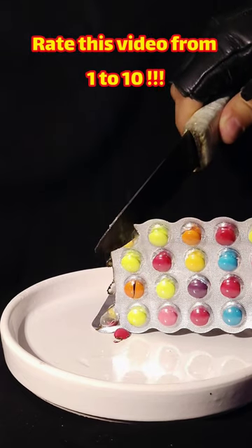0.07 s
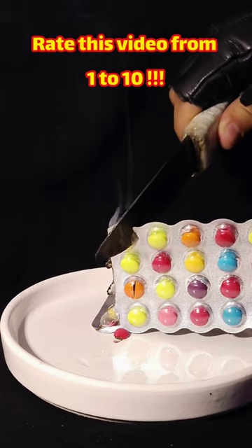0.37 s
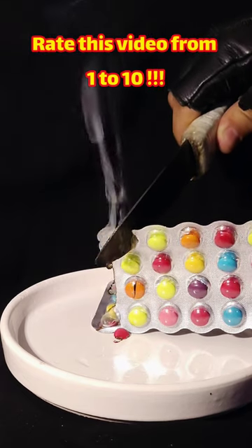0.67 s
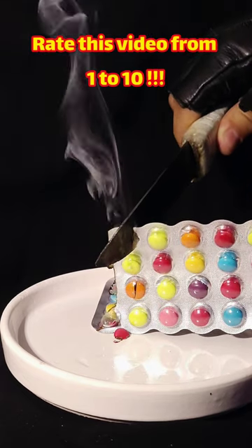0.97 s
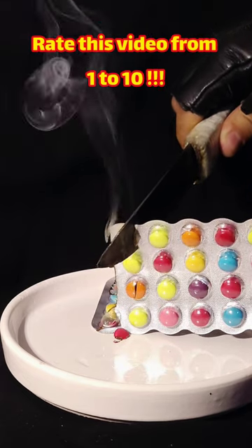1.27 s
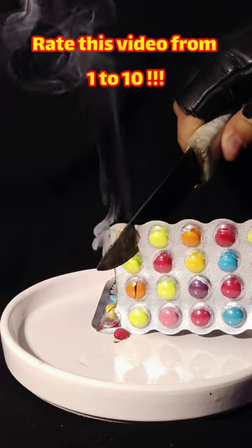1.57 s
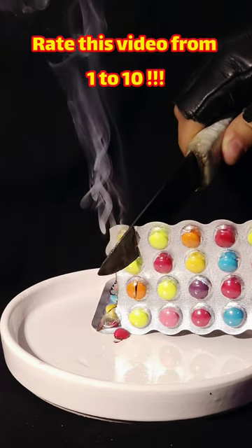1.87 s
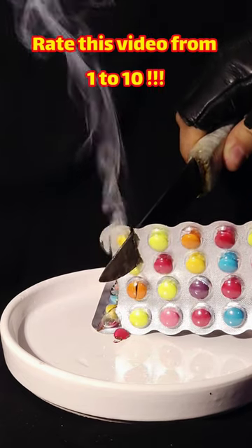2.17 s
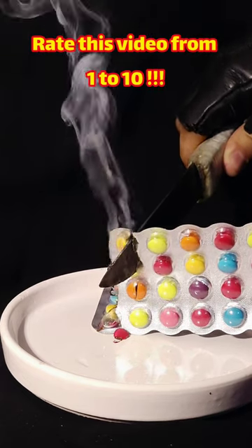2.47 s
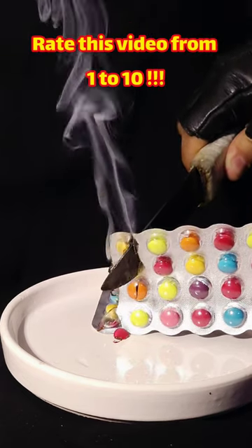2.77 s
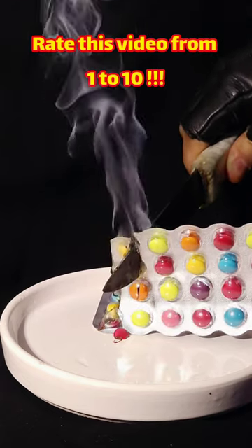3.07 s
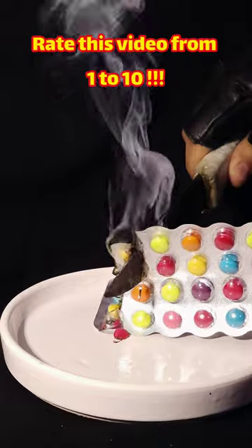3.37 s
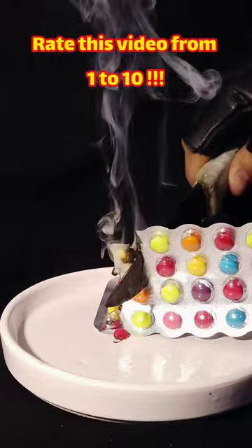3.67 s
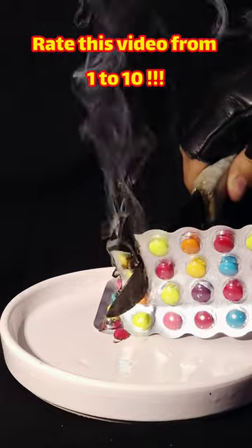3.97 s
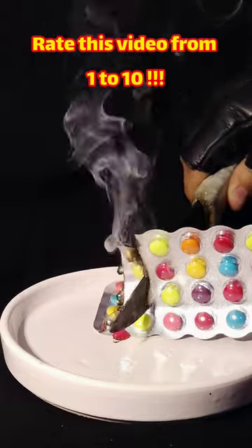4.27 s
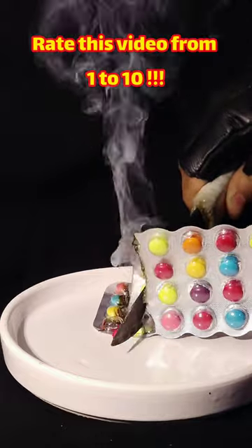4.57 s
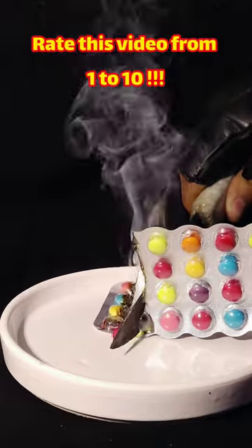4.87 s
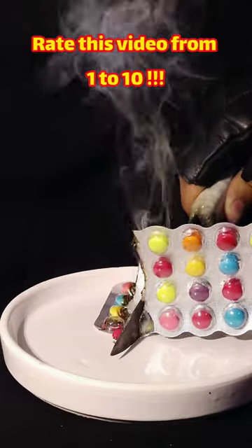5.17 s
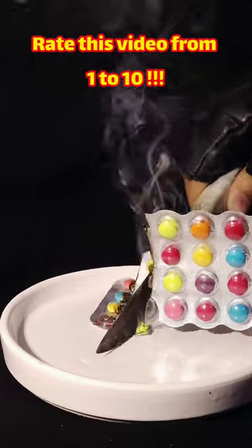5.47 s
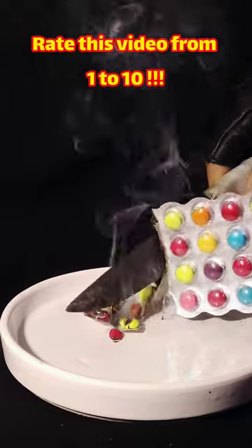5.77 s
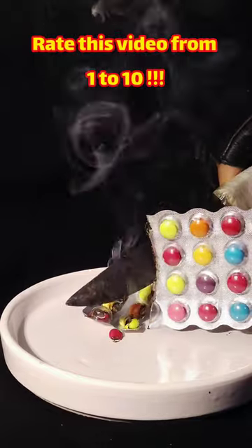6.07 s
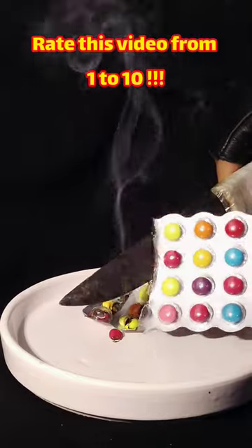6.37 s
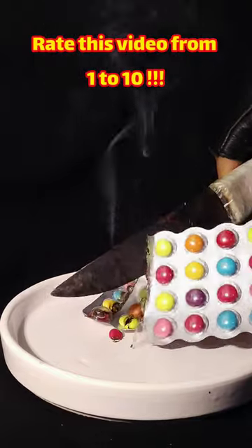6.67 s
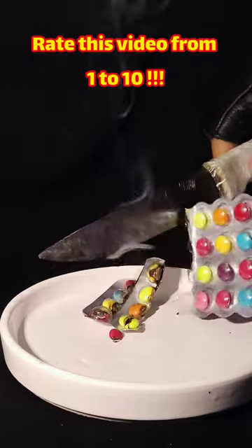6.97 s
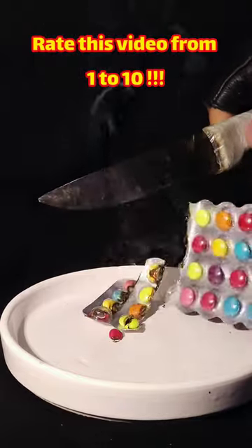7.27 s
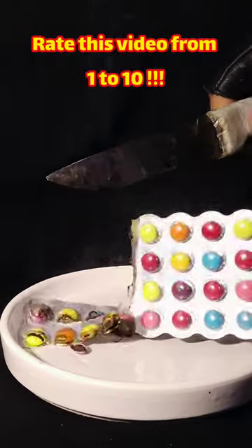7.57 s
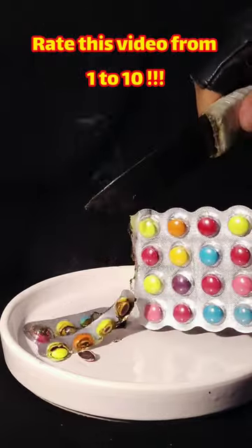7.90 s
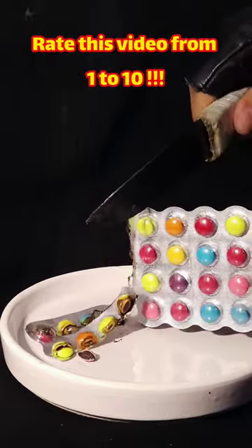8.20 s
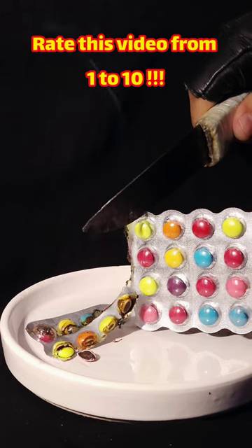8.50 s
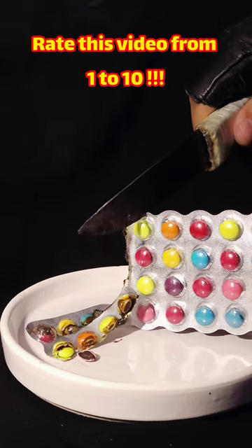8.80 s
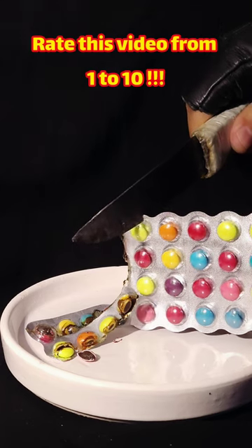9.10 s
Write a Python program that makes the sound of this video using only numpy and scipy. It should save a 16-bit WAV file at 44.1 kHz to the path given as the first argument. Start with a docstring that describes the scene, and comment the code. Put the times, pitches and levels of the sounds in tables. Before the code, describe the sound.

Close, soft fizzing and crackles of melting plastic packaging, with two sharp clacks of a blade on a plate, then crinkly scraping.

```python
"""A small, quiet room, a stereo microphone close to a ceramic plate, a fan far off.
On the plate a hot knife melts down through a plastic and foil blister pack. The melt fizzes; the pack
crackles, and creaks and groans as the blade sticks and slips. The blade breaks through and knocks on
the plate twice. Then the pack is dragged free and its cut strip scrapes over the glaze."""
import sys
import numpy as np
from scipy import signal
from scipy.fft import rfft, irfft, next_fast_len
from scipy.io import wavfile
from scipy.ndimage import uniform_filter1d, map_coordinates

SR = 44100
rng = np.random.default_rng(int(sys.argv[2]) if len(sys.argv) > 2 else 0)


def output_pcm(signal):
    """Save a mono or channel-first signal as 16-bit PCM at the path in sys.argv[1].

    Samples are clipped to [-1, 1] before scaling.
    """
    pcm = np.clip(np.atleast_2d(signal).T, -1, 1) * 32767
    wavfile.write(sys.argv[1], SR, np.round(pcm).astype(np.int16))


N = 411894
TIME = np.arange(N) / SR
AGE = np.arange(SR // 2) / SR  # seconds into one short event


def amp(db):
    """Decibels to gain."""
    return 10 ** (np.asarray(db) / 20)


def unit(x):
    """Scale to rms 1."""
    return x / np.sqrt(np.mean(x ** 2) + 1e-20)


def struck(x):
    """Scale so that the first 8 ms have rms 1."""
    return x / np.sqrt(np.mean(x[:350] ** 2) + 1e-20)


def along(points, hz):
    """Read (frequency, value) points on a log axis."""
    f, values = np.transpose(points)
    return np.interp(np.log(hz + 1), np.log(f + 1), values)


def curve(rows, column=1):
    """One column of a timed table, per sample."""
    rows = np.asarray(rows)
    return np.interp(TIME, rows[:, 0], rows[:, column])


def fade(t60):
    """Exponential decay, 60 dB down after t60 seconds."""
    return np.exp(-np.log(1000) * AGE / max(t60, 1e-3))


def swell(middle_s, half_s):
    """A bell-shaped rise and fall."""
    return np.exp(-.5 * ((TIME - middle_s) / half_s) ** 2)


def envelope(start, end, attack_s, release_s, sag_db_per_s=0):
    """Attack, a hold that may sag, release."""
    held = np.clip(TIME - start, 0, end - start)
    rise = np.clip((TIME - start) / attack_s, 0, 1)
    release = np.exp(-np.clip((TIME - end) / release_s, 0, 20))
    return rise * amp(-sag_db_per_s * held) * release


def wobble(rate, size=N):
    """A smooth random curve, rate knots a second."""
    knots = rng.standard_normal(int(size * rate / SR) + 4)
    return map_coordinates(knots, [TIME[:size] * rate], order=2)


def filtered(x, response):
    """Filter by a complex response of frequency."""
    n = x.shape[-1]
    padded = 2 * next_fast_len(n // 2 + 4096)
    hz = np.fft.rfftfreq(padded, 1 / SR)
    return irfft(rfft(x, padded) * response(hz), padded)[..., :n]


def coloured(x, spectrum, size=2048):
    """Minimum-phase filter with the given spectrum."""
    gain = amp(along(spectrum, np.fft.rfftfreq(size, 1 / SR)))
    cepstrum = irfft(np.log(gain))
    cepstrum[1:size // 2] *= 2
    cepstrum[size // 2 + 1:] = 0
    impulse = irfft(np.exp(rfft(cepstrum)))
    return signal.oaconvolve(x, impulse)[:len(x)]


def band(x, low_hz, high_hz):
    """Causal band-pass."""
    sos = signal.butter(3, [low_hz, min(high_hz, .49 * SR)], "band", fs=SR, output="sos")
    return signal.sosfilt(sos, x)


def patches(x, depth_db):
    """Bands swell and fade, each at its own moments."""
    bands = signal.stft(x, nperseg=512)[2]
    drift = uniform_filter1d(rng.standard_normal(bands.shape), size=5, axis=0)
    drift = unit(uniform_filter1d(drift, size=40, axis=1))
    return unit(signal.istft(bands * amp(depth_db * drift), nperseg=512)[1][:N])


def leaning(pair, balance):
    """Tilt a stereo pair left or right by frequency, keeping its power."""
    def response(hz):
        sides = np.array([amp(along(balance, hz)), np.ones_like(hz)])
        return sides / np.sqrt(np.mean(sides ** 2, axis=0))
    return filtered(pair, response)


def add(track, t, sound):
    """Mix a sound in at t seconds."""
    part = track[round(t * SR):][:len(sound)]
    part += sound[:len(part)]


def grains(size, rate, spread_db):
    """Tiny random clicks of uneven strength, rate a second, rms 1."""
    hits = rng.random(size) < rate / SR
    sign = rng.choice([-1, 1], size)
    strength = amp(spread_db * np.clip(rng.standard_normal(size), -2, 2))
    return unit(hits * sign * strength)


def burst(t60, crack_db, crack_t60):
    """A sharp crack followed by a short crumple."""
    return grains(len(AGE), rate=6800, spread_db=4.5) * (fade(t60) + amp(crack_db) * fade(crack_t60))


def ring(modes, scatter_db):
    """Damped modes with random phases and strengths scattered by scatter_db."""
    draws = rng.standard_normal((len(modes), 2))
    return sum(amp(db + scatter_db * strength) * fade(t60) * np.sin(2 * np.pi * hz * AGE + np.pi * phase)
               for (hz, db, t60), (strength, phase) in zip(modes, draws))


def stick_slip(speed, jitter, scatter_db):
    """One pulse per slip, unevenly spaced; faster slips are weaker, so the power holds."""
    rate = curve(speed) * np.exp(jitter * wobble(150))
    slips = np.diff(np.floor(np.cumsum(rate) / SR), prepend=0)
    return slips / np.sqrt(rate) * amp(scatter_db * wobble(200))


# Spectrum of the room's air: f/Hz, level/dB (levels in all tables are relative)
AIR_SPECTRUM = [(20, -18.5), (50, -11.5), (90, -5.5), (200, -7), (290, -8), (350, -5.5), (420, -6.5),
                (530, -4), (800, -21.5), (1500, -28.5), (2500, -33), (5000, -44.5), (9000, -41.5),
                (16000, -47)]
# Tones of the far fan: f/Hz, level/dB
FAN_TONES = [(50, -81), (120, -81), (355, -77.5), (1135, -90.5)]
# The background sits to the right: f/Hz, left minus right/dB
ROOM_BALANCE = [(150, -1), (500, -4), (1100, -12.5), (2200, -1.5)]
def room_tone():
    """Low air noise all round the microphone and the faint, unsteady hum of a far fan."""
    shared, left, right = (unit(coloured(rng.standard_normal(N), AIR_SPECTRUM)) for _ in range(3))
    hum = sum(amp(db) * np.sqrt(2) * np.sin(2 * np.pi * hz * TIME + 1.4 * wobble(19))
              for hz, db in FAN_TONES)
    air = amp(-73.5 + .57 * wobble(9)) * (shared + amp(-3.5) * np.array([left, right]))
    return leaning(air + hum, ROOM_BALANCE)


# Decay of the room: f/Hz, t60/s
ROOM_DECAY = [(100, 0.53), (1000, 0.32), (5000, 0.35), (15000, 0.14)]
def reverb(x):
    """The walls answer after 3 ms, differently on each side of the microphone."""
    hz, t, noise = signal.stft(rng.standard_normal((2, SR // 2)), SR, nperseg=256)
    decay = np.exp(-np.log(1000) * t / along(ROOM_DECAY, hz)[:, None])
    tail = signal.istft(noise * decay, SR)[1]
    tail = np.pad(tail / np.linalg.norm(tail[0]), ((0, 0), (SR // 300, 0)))
    return signal.oaconvolve(x[None], tail, axes=1)[:, :N]


def near_echoes(x, taps=500):
    """Plate and table echo the treble within milliseconds; the echoes shift as the pack moves."""
    treble = band(x, 1900, SR / 2)
    bands = signal.stft(treble, nperseg=128)[2]
    phases = np.exp(2j * np.pi * rng.random((2, *bands.shape)))
    scatter = signal.istft(bands * phases, nperseg=128)[1][:, :N]
    echoes = rng.standard_normal((2, 2, taps)) * np.linspace(1, 0, taps) ** 2
    echoes /= np.linalg.norm(echoes, axis=2, keepdims=True)
    here, there = signal.oaconvolve(treble[None, None], echoes, axes=2)[..., :N]
    place = 2 * wobble(6)
    return amp(-4.5) * scatter + amp(-2.5) * (np.cos(place) * here + np.sin(place) * there)


# Pushes of the hand: middle t/s, half length/s, level/dB
HAND_PUSHES = [(3.15, 0.18, -76), (5.4, 0.22, -69), (6.25, .25, -71), (7.7, 0.58, -75), (8.77, 0.12, -64.5)]
# Dull bumps through the table: t/s, level/dB, t60/s, lower f/Hz, upper f/Hz
TABLE_BUMPS = [(1.19, -52, 0.3, 50, 318), (1.244, -49.5, 0.56, 50, 320), (2.052, -40.5, 0.1, 70, 282),
               (2.089, -43, 0.17, 60, 285), (4.594, -34, 0.26, 40, 220), (5.056, -28, 0.27, 45, 378),
               (8.748, -49, 0.62, 200, 755)]
def table_bumps():
    """The hand on the plate shakes the table: a steady rumble, swells and thuds."""
    force = amp(-85) + sum(amp(db) * swell(t, half) for t, half, db in HAND_PUSHES)
    out = unit(band(rng.standard_normal(N), 64, 97)) * force * amp(-2)
    for t, db, t60, low_hz, high_hz in TABLE_BUMPS:
        thud = unit(band(rng.standard_normal(len(AGE)), low_hz, high_hz))
        add(out, t, amp(db - 8) * thud * fade(t60) * (1 - fade(.012)))
    return out


# Gentle drags of the blade: start t/s, end t/s, level/dB
GENTLE_DRAGS = [(1.69, 1.92, -62.5), (2.11, 2.304, -61.5)]
def sheet_drone(start_hz=126.5, sag_hz_per_s=52):
    """The whole sheet hums softly as the blade drags, ever lower."""
    pitch = start_hz - sag_hz_per_s * (TIME - GENTLE_DRAGS[0][0])
    phase = 2 * np.pi * np.cumsum(pitch) / SR
    tone = np.sin(phase) + amp(-12.5) * np.sin(2 * phase) + amp(-6.5) * np.sin(3 * phase)
    drag = sum(amp(db) * envelope(start, end, attack_s=.04, release_s=.053, sag_db_per_s=44)
               for start, end, db in GENTLE_DRAGS)
    return tone * drag * amp(1.2 * wobble(40))


# Melt on the hot blade: t/s, fizz level/dB, frying level/dB
MELT_LEVELS = [(0, -74, -71), (.55, -69, -74.5), (.85, -69.5, -81), (1.25, -66.5, -73), (1.9, -72.5, -81),
               (2.5, -74.5, -81), (3.2, -68.5, -66), (3.8, -69.5, -79), (4.3, -71, -73), (5.0, -72, -83.5),
               (5.5, -72.5, -84.5), (5.75, -75, -73), (6.72, -86, -83), (6.95, -68, -70), (7.9, -82.5, -82),
               (8.4, -93.5, -93), (8.85, -96, -91), (9.3, -80.5, -75)]
# Spectra of the fine fizz and the coarser frying: f/Hz, level/dB
FIZZ_SPECTRUM = [(4000, -34), (7600, -4), (8600, -5), (10400, 0), (11100, 1), (11800, 2), (12600, 1),
                 (13400, 0.5), (16000, -4)]
FRY_SPECTRUM = [(600, -8), (1050, -1), (1300, -9), (1600, -6.5), (2200, -14.5), (3700, -9), (4250, -1),
                (5100, -1), (5800, -8), (6600, -3), (7800, -12.5), (16000, -22)]
def sizzle():
    """Melt bubbles burst: a fine, spitting fizz, the same on both sides, over wide, coarser frying."""
    bubbles = grains(N, rate=7000, spread_db=5.5) * amp(.97 * wobble(45))
    spits = amp(-14.5) * grains(N, rate=60, spread_db=5)
    fizz = patches(coloured(bubbles + spits, FIZZ_SPECTRUM), depth_db=.9)
    fry = np.array([patches(coloured(grains(N, rate=5900, spread_db=6), FRY_SPECTRUM), depth_db=4.5)
                    for _ in range(2)])
    fizz_db = curve(MELT_LEVELS) + .8
    fry_db = curve(MELT_LEVELS, column=2) + .93 * wobble(12) + 4.5
    return fizz * amp(fizz_db) + fry * amp(fry_db)


# Modes of the ceramic plate and the steel blade: f/Hz, level/dB, t60/s
PLATE_MODES = [(118, -10, .35), (447, -4, .2), (705, -3, .23), (1000, 2, .18), (1160, -5, .17),
               (1287, -2, .2), (1572, -9, .25), (1646, -2, .16), (2288, -12, .22), (2810, -6, .22),
               (4129, -11, .21), (4430, -8, .25), (4651, -9, .16), (5066, -16, .18), (6342, -18, .15),
               (8333, -24, .1), (8769, -17, .14), (11140, -23, .15), (11700, -21, .14), (12090, -23, .1),
               (13750, -23, .16)]
BLADE_MODES = [(603, -6, 0.16), (1227, 0, 0.17), (1590, -6, .16), (3009, -3.5, 0.3), (3478, -25, 0.37),
               (4565, -14, 0.12), (5286, -8.5, 0.24), (6498, -10, 0.11), (7817, -17, 0.35),
               (8086, -34, 0.29), (8382, -32, 0.24), (9410, -35, 0.28)]
# What rings on after each blow: t/s, plate level/dB, blade level/dB
RING_LEVELS = [(4.591, -34.5, -72), (5.054, -46, -31)]
def ringing():
    """The first blow sets the plate ringing, the second mostly the blade."""
    out = np.zeros(N)
    for t, plate_db, blade_db in RING_LEVELS:
        plate = amp(plate_db) * ring(PLATE_MODES, scatter_db=4.8)
        blade = amp(blade_db) * ring(BLADE_MODES, scatter_db=0)
        add(out, t, (plate + blade) * (1 - fade(.0075)))
    return out


# Spectrum of friction on the glaze: f/Hz, level/dB
GLAZE_SPECTRUM = [(1000, -49.5), (1600, -21.5), (2200, -25.5), (2800, -14), (3700, -28.5), (4450, -19),
                  (5100, -30), (6300, -4), (8700, 3.5), (12000, -0.5), (13800, 0.5), (16000, -2.5)]
# Squeaks of a foil edge: middle t/s, level/dB, half length/s, grit level/dB
FOIL_SQUEAKS = [(7.542, -44.5, .006, -0.5), (7.561, -46.5, .006, 0), (7.654, -56.5, 0.025, -5),
                (7.687, -43.5, 0.0063, 0)]
def squeaks():
    """Fine friction of foil on the glaze excites the plate's highest modes."""
    out = np.zeros(N)
    for t, db, half, grit_db in FOIL_SQUEAKS:
        grit = unit(coloured(rng.standard_normal(N), GLAZE_SPECTRUM)) * swell(t, half)
        sing = signal.oaconvolve(grit, ring(PLATE_MODES, scatter_db=4))[:N]
        sing *= np.linalg.norm(grit) / np.linalg.norm(sing)
        out += amp(db) * (amp(grit_db) * grit + sing)
    return out


# Resonances of a hollow blister: f/Hz, width/Hz, level/dB
BLISTER_MODES = [(207, 170, 1), (473, 37, 8), (653, 160, 5)]
# The blister judders under the blade: start t/s, end t/s, level/dB, release/s
JUDDERS = [(3.135, 3.15, -44, 0.0018), (3.172, 3.224, -46, 0.079)]
def groan():
    """Fast slips drive a hollow blister, turning rough and then slowing."""
    def hollow(f):
        return sum((-1) ** k * amp(db) * 1j * f * width / (hz * hz - f * f + 1j * f * width)
                   for k, (hz, width, db) in enumerate(BLISTER_MODES))
    speed = [(3.22, 222.2), (3.43, 101.3)]  # t/s, slip f/Hz
    roughness = np.interp(TIME, [3.19, 3.22], [.05, .35])
    slips = stick_slip(speed, roughness, scatter_db=4)
    judder = unit(band(filtered(slips, hollow), 92, 670))
    return judder * sum(amp(db) * envelope(start, end, attack_s=.0027, release_s=release)
                        for start, end, db, release in JUDDERS)


# Spectrum of the sheet at the cut: f/Hz, level/dB
CUT_SPECTRUM = [(120, -27), (220, -13.5), (355, -6.5), (520, -11.5), (750, -19), (1250, -7.5), (1650, -2),
                (2050, 0.5), (2500, -1.5), (3200, -5), (3900, -12), (5500, -17), (9000, -21), (16000, -26)]
# The blade sticks and slips in the cut: t/s, slip f/Hz, level/dB
CREAK_PATH = [(2.6, 72, -65), (2.73, 69, -54.5), (2.85, 154, -54.5), (2.91, 246, -48), (2.965, 84, -52),
              (3.04, 65, -71), (3.12, 65, -79)]
# Runs of slow, even slips early and late in the creak: start t/s, end t/s, period/s, level/dB
SLOW_SLIPS = [(2.69, 2.79, .03, -46.5), (2.974, 3.12, .0257, -45)]
def creak():
    """The blade ratchets through the sheet, speeds up, then slows to single, brighter slips."""
    pulses = unit(stick_slip(CREAK_PATH, jitter=.19, scatter_db=2.5))
    grit = amp(-1) * grains(N, rate=5200, spread_db=5)
    cutting = (TIME > CREAK_PATH[0][0]) & (TIME < CREAK_PATH[-1][0])
    out = unit(coloured(pulses + grit, CUT_SPECTRUM)) * amp(curve(CREAK_PATH, column=2)) * cutting
    treble_lift = [(2500, 0), (6000, 5)]  # f/Hz, level/dB
    for start, end, period, db in SLOW_SLIPS:
        for t in np.arange(start, end, period):
            tick = coloured(burst(t60=.04, crack_db=8, crack_t60=.0066), CUT_SPECTRUM)
            slip = struck(coloured(tick, treble_lift))
            add(out, t, amp(db - 4 - .1 * rng.standard_normal()) * slip)
    return out


# Spectrum of the crackling pack: f/Hz, level/dB
PACK_SPECTRUM = [(100, -17.5), (280, -19), (450, -5.5), (680, -11), (1000, -5), (1400, -3.5), (1800, -6),
                 (2200, -8), (2750, -9), (3400, -16), (5200, -13), (7500, -18.5), (11000, -22),
                 (16000, -24.5)]
# Strokes of the pack along blade and plate: start t/s, end t/s, attack/s, level/dB, treble level/dB
PACK_STROKES = [(.035, 0.108, .006, -61.5, -1.5), (0.271, 0.53, 0.055, -82, -23),
                (1.096, 1.11, .004, -47.5, -2.5), (1.129, 1.25, .006, -54.5, -3.5),
                (2.018, 2.254, .02, -55.5, -1), (2.43, 2.488, .004, -53.5, -2),
                (2.488, 2.675, .006, -54.5, -3.5), (3.86, 3.95, .006, -69, 7),
                (4.11, 4.153, .015, -57, 10.5), (4.29, 4.38, .006, -67, 8.5), (5.18, 5.285, .01, -43, -1),
                (5.525, 5.617, .006, -63, 2), (5.812, 5.886, .01, -65.5, 7.5),
                (5.955, 6.097, .02, -51.5, -1.5), (6.18, 6.273, .06, -52.5, 12),
                (6.37, 6.64, .02, -56.5, 4.5), (6.781, 6.86, .01, -51, -1.5), (6.86, 7.04, .06, -58.5, 12),
                (7.056, 7.085, .012, -42.5, -2), (7.082, 7.108, .005, -34, -3.5),
                (7.254, 7.307, .008, -41.5, -0.5), (7.333, 7.444, .01, -49.5, -3),
                (7.453, 7.544, .02, -61, 8), (7.583, 7.64, .008, -47, 4.5), (8.517, 8.581, .01, -79, 4)]
def rubbing(release_s=.0083, sag_db_per_s=24, catch_db=2.5):
    """The cut edge bites, eases and lets go in clumps of crackles; foil rubs brighter than plastic."""
    out, size = np.zeros(N), len(AGE)
    for start, end, attack, db, treble_db in PACK_STROKES:
        bite = np.clip(AGE / attack, 0, 1)
        release = np.exp(-np.maximum(AGE - (end - start), 0) / release_s)
        pressure_db = db - sag_db_per_s * AGE + catch_db * wobble(60, size)
        clumps = amp(3 * wobble(220, size) - .7)
        crackle = unit(coloured(grains(size, rate=4900, spread_db=5) * clumps, PACK_SPECTRUM))
        tilt = [(1800, 0), (7000, treble_db), (15000, treble_db - 5)]  # f/Hz, level/dB
        scrape = filtered(crackle, lambda hz: amp(along(tilt, hz)))
        add(out, start, amp(pressure_db) * bite * release * scrape)
    return out


# The loudest snaps; foil is bright, a blister hollow: t/s, level/dB, body level/dB, treble level/dB
PACK_SNAPS = [(.031, -46, -24, 0.5), (.09, -46, -7, -12.5), (1.11, -34.5, -25, -22),
              (1.142, -32, -12, -22.5), (1.186, -42, 3, -15), (1.202, -35.5, -22, -20),
              (1.236, -39, -3, -16.5), (1.276, -45, -3, -16), (1.985, -50, -5, -7.5),
              (2.048, -37, -14, -13), (2.086, -37.5, -17, -16), (2.428, -30.5, -5, -3),
              (2.495, -39, -8, -13), (2.515, -35, -6.5, -16), (2.56, -34, -7.5, -16),
              (3.132, -36.5, -18, -9), (3.17, -32.5, -11, -14), (3.251, -37, -25, -8),
              (3.367, -43.5, -27, -15), (3.381, -43, -32, -13.5), (3.937, -51, -52, -9.5),
              (3.966, -60, -7, 8.5), (4.29, -47, -6, -6.5), (4.37, -51, -14.5, -7), (5.156, -46, -20.5, 4),
              (5.178, -35, -25, 1), (5.232, -30, -11, 0), (5.825, -40.5, -15, -35),
              (6.007, -38, -7.5, -18.5), (6.047, -36, -9, -27), (6.29, -30.5, -2.5, -6),
              (6.405, -38, -21, -38), (6.515, -42, -32, -25), (6.844, -36.5, -27, -33),
              (7.018, -34, -8, -9.5), (7.085, -23, -25.5, -30.5), (7.09, -22, -10, -27),
              (7.394, -42, -20, 3.5), (7.591, -28.5, -14.5, -27), (8.208, -71.5, -17, 2.5)]
def snaps():
    """Every snap rings the same pack; the more foil tears, the brighter it is."""
    out = np.zeros(N)
    bands_hz = [(120, 700), (700, 6000), (6000, 16000)]
    for t, db, body_db, treble_db in PACK_SNAPS:
        snap = coloured(burst(t60=.045, crack_db=3, crack_t60=.006), PACK_SPECTRUM)
        body, middle, treble = (struck(band(snap, low, high)) for low, high in bands_hz)
        add(out, t, amp(db - 10.5) * (middle + amp(body_db) * body + amp(treble_db + 5.5) * treble))
    return out


def table_boom(hits):
    """Each hit shakes the table, and each side of the microphone feels it differently."""
    out = np.zeros((2, N))
    for side in out:
        for t, db, _ in hits:
            boom = unit(band(rng.standard_normal(len(AGE)), 28, 80))
            add(side, t, amp(db - 41) * boom * fade(t60=.4))
    return out


# Spectrum of steel on ceramic: f/Hz, level/dB
CLACK_SPECTRUM = [(60, -21), (200, -17), (440, -4), (620, -8), (1020, -1.5), (1300, -1.5), (1650, 1),
                  (2100, -13.5), (2850, -5.5), (3400, -21.5), (4700, -10), (7000, -18.5), (12000, -21),
                  (16000, -24)]
# The blade hits the plate twice and chatters: t/s, level/dB, rattle t60/s
BLADE_HITS = [(4.5841, -15.5, 0.026), (4.591, -17, 0.084), (4.597, -16, 0.04), (4.606, -26, 0.13),
              (4.628, -25.5, 0.12), (4.645, -30.5, 0.07), (5.051, -18, 0.026), (5.0593, -20, 0.011)]
def knocks():
    """Steel meets ceramic in a dense clack, right by the microphone."""
    out = np.zeros(N)
    for t, db, t60 in BLADE_HITS:
        rattle = grains(len(AGE), rate=14000, spread_db=2) * fade(t60) * (1 - fade(.012))
        add(out, t, amp(db - 8.5) * struck(coloured(rattle, CLACK_SPECTRUM)))
    return out


# Balance of the plate's sounds at the microphone: f/Hz, left minus right/dB
MIC_BALANCE = [(100, -2), (500, -2), (780, -6), (1100, -1), (1400, -7), (2100, -2), (2700, 2.5),
               (4200, 3.5), (5600, 2.5), (6900, -4), (9500, 10.5), (15000, 11)]
def scene():
    """Close to the plate: sound reaches the left side first; the left is brighter, the right fuller."""
    contact = rubbing() + snaps() + creak() + groan() + sheet_drone() + knocks() + table_bumps()
    tones = ringing() + squeaks()
    left_lead_s = 8.5 / SR
    shade = [(1200, .5), (2400, 0), (5000, -9), (12000, -5)]  # direct path: f/Hz, level/dB
    direct = filtered(contact, lambda hz: amp(along(shade, hz))) + tones
    direct = filtered(direct, lambda hz: np.exp(1j * np.pi * hz * left_lead_s * np.array([[1], [-1]])))
    pair = direct + near_echoes(contact) + amp(-10) * reverb(contact + tones) + sizzle()
    return leaning(pair, MIC_BALANCE) + table_boom(BLADE_HITS) + room_tone()


def record(dry, top_hz=16000):
    """The recorder keeps nothing above its band limit."""
    return filtered(dry, lambda hz: hz < top_hz)


dry = scene()
out = record(dry)
output_pcm(out)
```